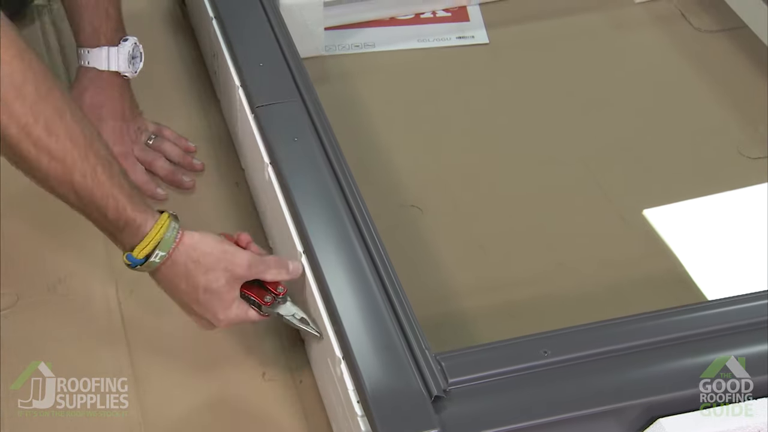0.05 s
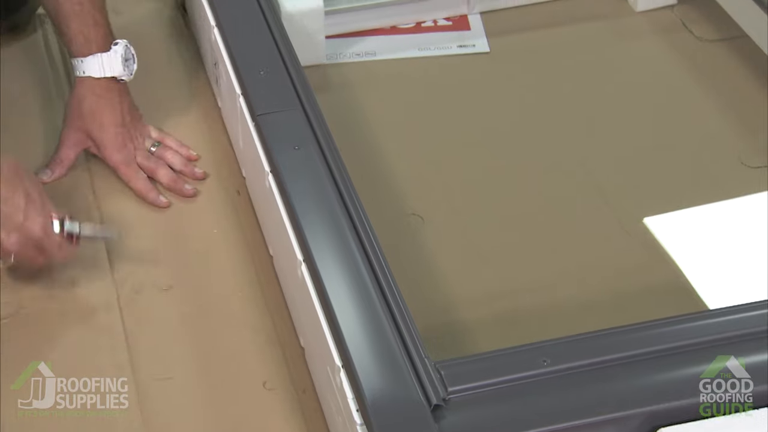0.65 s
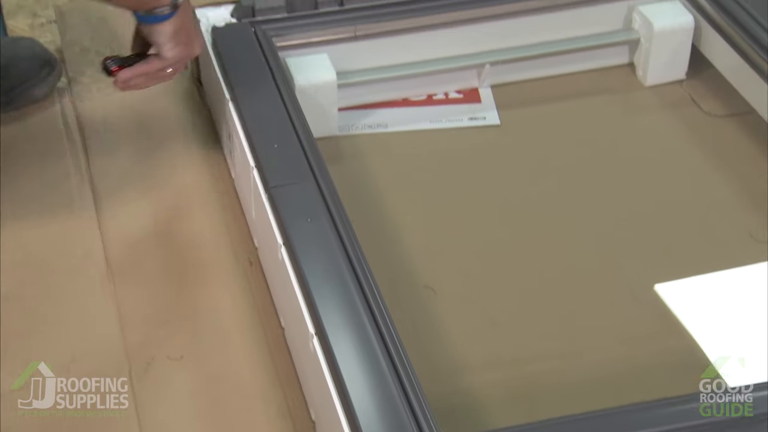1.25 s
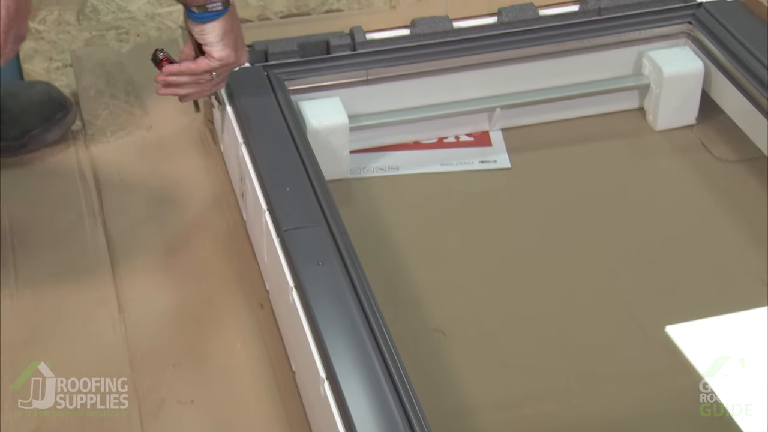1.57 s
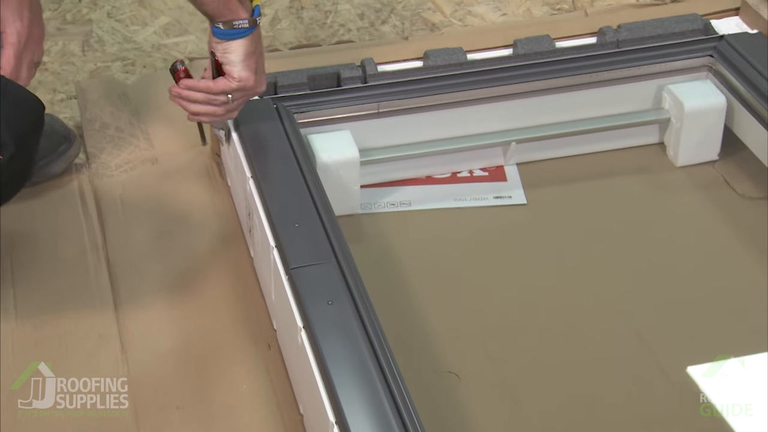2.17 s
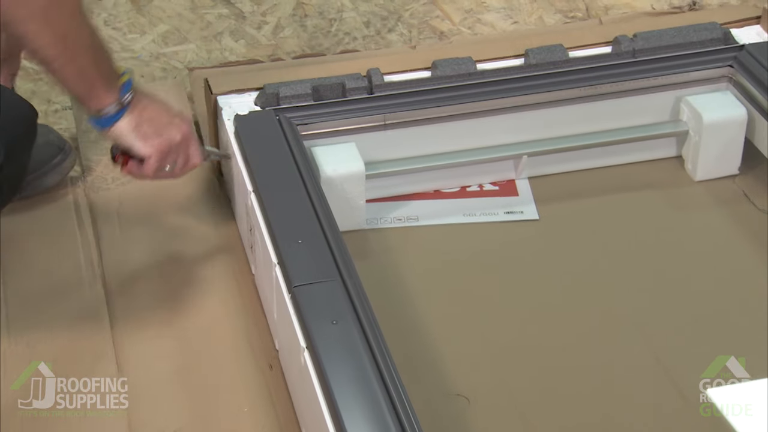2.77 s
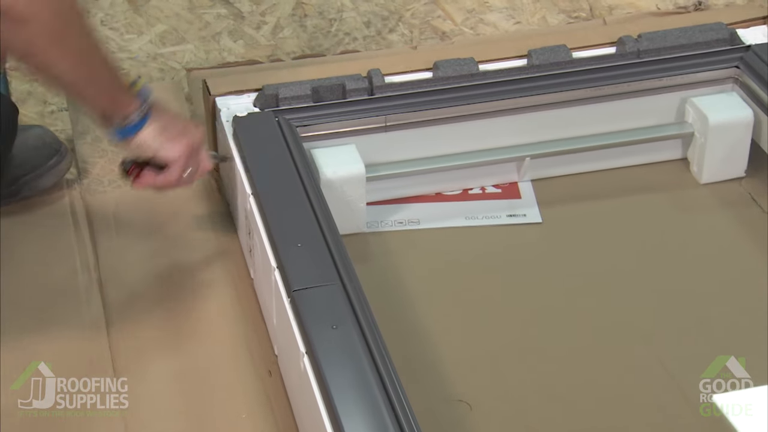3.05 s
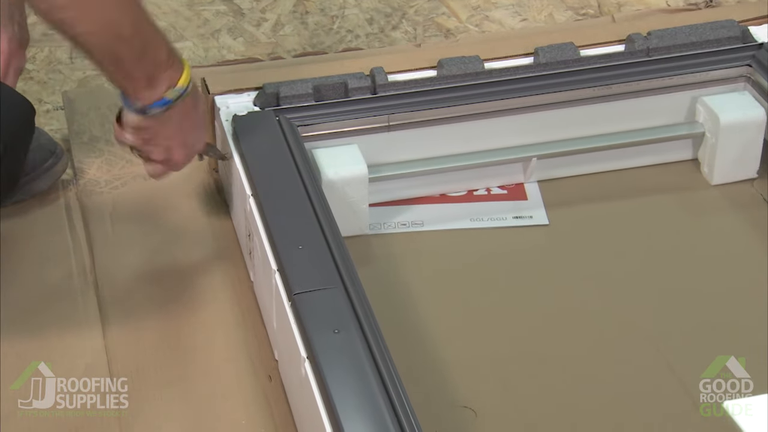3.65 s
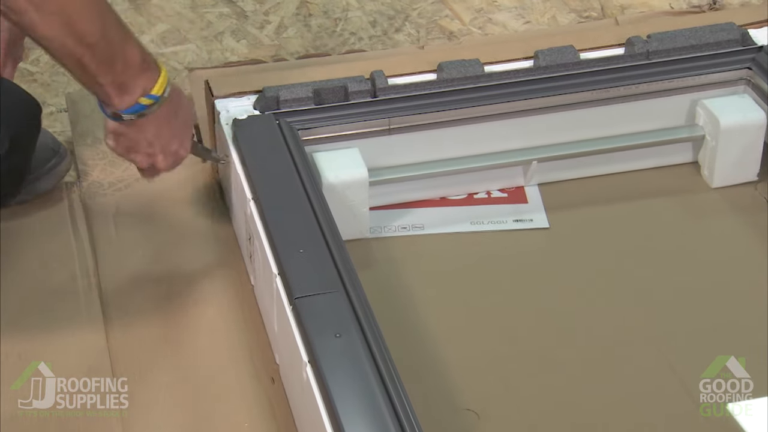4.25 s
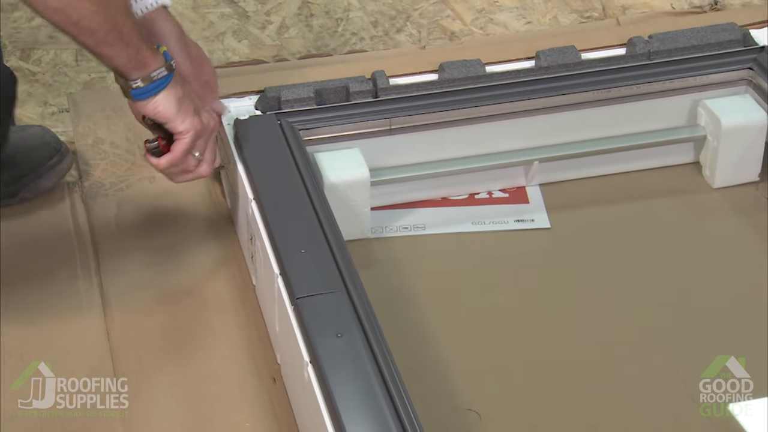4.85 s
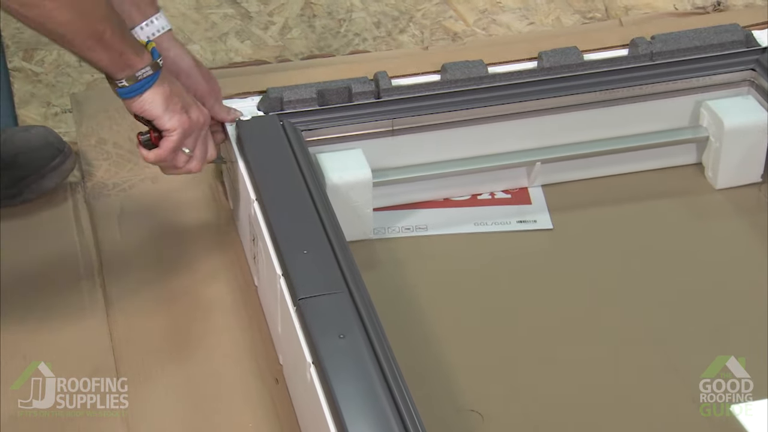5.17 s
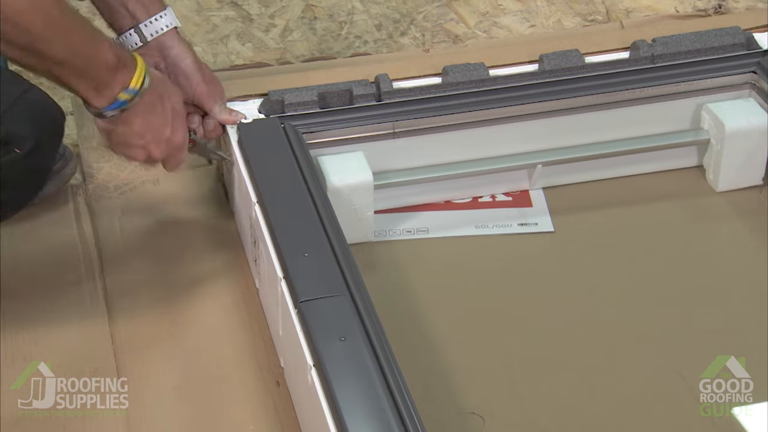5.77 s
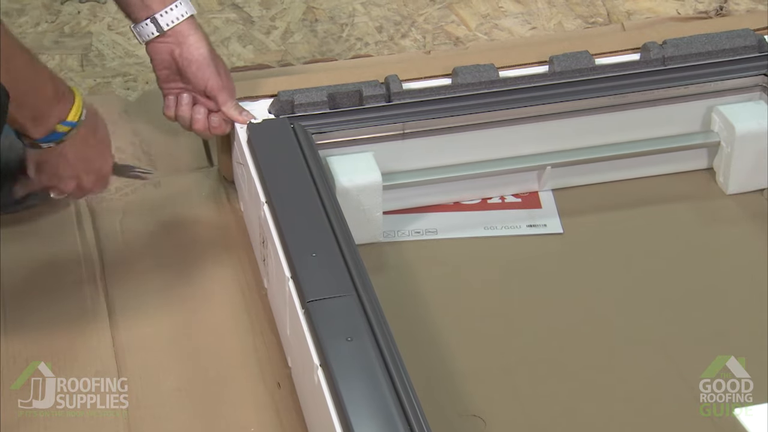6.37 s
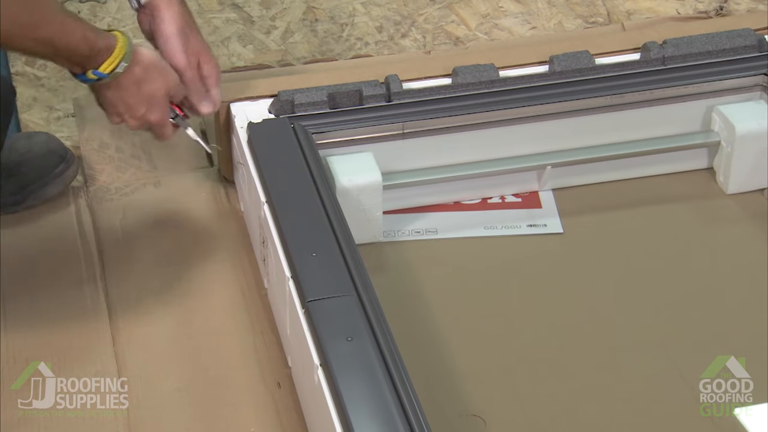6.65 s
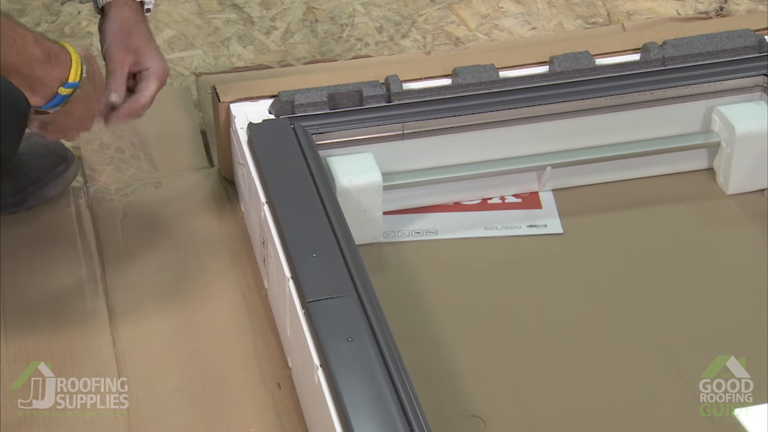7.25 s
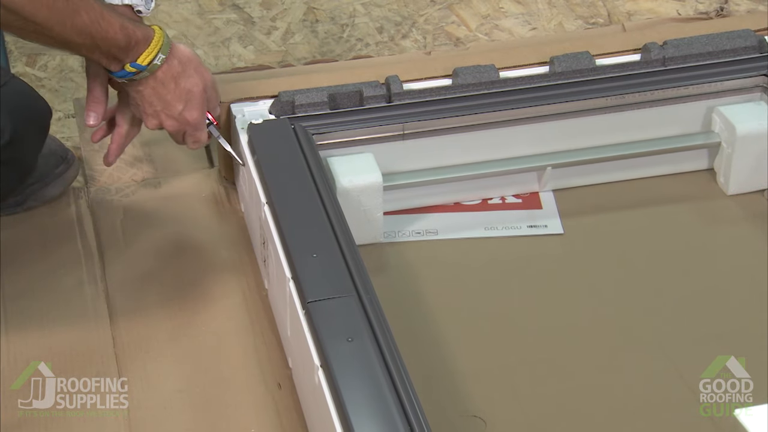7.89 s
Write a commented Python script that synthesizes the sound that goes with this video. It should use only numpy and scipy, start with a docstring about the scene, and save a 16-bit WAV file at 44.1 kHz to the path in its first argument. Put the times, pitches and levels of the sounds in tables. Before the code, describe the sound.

Pliers pull staples from a wooden window frame with sharp snaps, short squeaks and small metal ticks in an echoing workshop.

```python
"""A large workshop: pliers pull staples out of a wooden window frame that lies on cardboard.
The jaws tick, knock and skid as they find a grip. Staples squawk by stick-slip in the wood and
snap free; the steel rings, the frame creaks and booms. Hands and sleeves brush about between
pulls. The hall answers every snap, over faint rumble, hiss and hum."""
import sys
import numpy as np
from scipy import signal
from scipy.fft import rfft, irfft
from scipy.io import wavfile
from scipy.ndimage import uniform_filter1d

SR = 44100
rng = np.random.default_rng(int(sys.argv[2]) if len(sys.argv) > 2 else 0)


def wrap_up_sound(samples):
    """Save the sound to the file named by the first command line argument, as 16-bit audio."""
    columns = np.atleast_2d(samples).T
    # keep every value between -1 and 1, then stretch to whole-number steps
    tamed = np.clip(columns, -1, 1)
    steps = np.round(tamed * 32767).astype(np.int16)
    wavfile.write(sys.argv[1], SR, steps)


N = 353839
TIME_S = np.arange(N) / SR

# room noise spectrum: freq_hz, gain_db
ROOM_SPECTRUM = [(8.8, -36), (15, -9.5), (54, -4.5), (155, -22), (233, -19.5), (330, -21.5), (371, -17),
                 (455, -27), (497, -15), (610, -25), (748, -24), (1640, -33.5), (2200, -37.5), (14700, -39),
                 (16000, -40.5)]
# room hum: pitch_hz, level_db
HUM_TONES = [(48.4, -78), (366, -87.5), (500, -86.5)]
# hall tail decay: freq_hz, t60_s
TAIL_DECAY = [(60, 0.46), (200, 0.88), (500, 0.99), (1100, .92), (1700, .78), (3000, 0.99), (6000, 0.53),
              (10000, .52), (16000, 0.43)]
# hall tail spectrum: freq_hz, gain_db
TAIL_SPECTRUM = [(40, -14), (120, -9), (200, -2), (340, 2.5), (470, -9.5), (580, -11), (720, -3),
                 (1100, -7), (2000, -2.5), (4000, -6), (8000, -5.5), (16000, -12)]
# near surfaces: delay_s, gain
REFLECTIONS = [(.0046, 0.47), (.0092, 0.034), (0.012, -0.11), (.0178, .13), (.0265, 0.19)]
# skin and cloth strokes: start_s, end_s, level_db, tilt_db_per_oct, rasp_db
BRUSH_STROKES = [(0.521, 0.646, -46, -0.6, -8), (0.741, .94, -51.5, 0.75, -10.5),
                 (.98, 1.401, -61, -0.5, -4.5), (4.218, 4.35, -51.5, -3, -7.5),
                 (4.713, 4.944, -57.5, 0, -0.5), (5.149, 5.502, -69, -3, -1),
                 (6.439, 6.894, -62.5, -0.4, -3.5), (6.771, 6.99, -77, 2.7, 1.5),
                 (7.031, 7.181, -65, -1.6, -0.5), (7.15, 7.421, -66, -2.5, -3),
                 (7.613, 8.045, -70.5, -9, 26)]
# colour of all brushing: freq_hz, gain_db
CLOTH_SPECTRUM = [(40, 0.5), (400, 2.5), (1000, -1), (2200, -2), (3400, 0.5), (5500, -0.5), (12000, -2),
                  (16000, -12.5)]
# range lifted by a rough stroke: freq_hz, rasp_share
RASP_LIFT = [(700, 0.063), (3600, 1), (9500, 1), (13500, 0)]
# wood groaning under leverage: start_s, end_s, level_db
WOOD_CREAKS = [(-.15, 0.356, -68.5), (1.777, 1.97, -68.5), (2.1, 2.249, -54.5), (2.198, 2.379, -72.5),
               (3.216, 3.381, -68.5), (3.371, 3.528, -65), (3.512, 3.661, -71.5), (5.119, 5.3, -66.5),
               (7.911, 8.072, -66)]
# colour of the wood: freq_hz, gain_db
WOOD_SPECTRUM = [(40, -17), (80, -2), (130, 5.5), (330, 1), (560, 3), (800, -6.5), (1000, -14),
                 (1250, -10.5), (1500, -8.5), (1900, -23), (2300, -16.5), (2650, -18.5), (3500, -29),
                 (5500, -33), (16000, -42)]
# blows shoving the frame against the floor: start_s, push_db, push_rise_s, boom_db
FRAME_THUDS = [(.247, -44, .0018, -47), (0.313, -37, 0.0033, -50), (.573, -50, .0022, -59),
               (0.705, -52.5, 0.0076, -74), (2.149, -61, .003, -52), (2.579, -53, 0.0019, -70.5),
               (2.685, -48, 0.0032, -82.5), (3.75, -38.5, 0.0027, -57), (4.023, -52.5, 0.0026, -57),
               (4.604, -54, .002, -65.5), (5.9205, -33, 0.0017, -35), (5.947, -38, .002, -49.5),
               (7.592, -46, .0032, -81)]
# low frame modes: freq_hz, level_db, t60_s
FRAME_MODES = [(58, -11, .3), (79, -9.5, .3), (99, -2, 0.32), (135, -3.5, 0.71), (151, -8, .15),
               (197, -11, 0.055), (250, -10, 0.04), (302, -5, .2)]
# steel modes of the pliers: freq_hz, level_db, t60_s
PLIER_MODES = [(2443, -3, .3), (3110, -7, .12), (3327, -5, .45), (3510, -7, .3), (4190, -2, .12),
               (4380, -4, .2), (4534, -1, .2), (4882, -6, .2)]
# blows that ring the pliers: start_s, level_db
PLIER_RINGS = [(.315, -44), (2.685, -71.5), (3.756, -61.5), (5.92, -58)]
# steel skidding on steel: start_s, pitch_hz, level_db
JAW_SKIDS = [(.314, 4400, -27.5), (.597, 2730, -46), (2.238, 7950, -71), (2.265, 7440, -67),
             (2.283, 2840, -68), (2.685, 14020, -51), (5.919, 5340, -38), (7.106, 14550, -65),
             (7.125, 7680, -67), (7.189, 7580, -72), (7.59, 8030, -51.5)]
# staple slipping in wood, and one short tone at 2.1 s under the creak: start_s, pitch_hz, level_db, swell_s,
# decay_s
STAPLE_SQUEAKS = [(.245, 435, -49, 0.0035, 0.014), (.316, 247.5, -41, 0.0041, 0.022),
                  (.530, 554, -36.5, 0.0016, 0.019), (.568, 708, -39.5, 0.0044, .004),
                  (1.469, 988, -43, 0.0031, 0.0032), (1.470, 533, -42, 0.0021, 0.0095),
                  (1.557, 570, -39.5, .0035, 0.018), (1.84, 366, -57, 0.0055, 0.0086),
                  (2.115, 556, -47.5, 0.025, 0.021), (3.286, 576, -48.5, 0.0069, .014),
                  (3.752, 563, -14, .0065, 0.007), (3.756, 322, -33, 0.008, .016),
                  (3.767, 584, -26, .005, .008), (3.850, 1663, -32, 0.0047, 0.012),
                  (5.9215, 1048, -14, 0.002, .00092), (5.925, 518, -26, 0.0015, 0.004),
                  (7.592, 880, -38, 0.0039, 0.0027)]
# jaws meeting staple and frame: start_s, level_db, tilt_db_per_oct, clack_db, decay_s
JAW_CONTACTS = [(.2365, -44.5, -6, -4, 0.0044), (.2441, -41, -2, -9.5, 0.0083),
                (.3272, -45.5, 0.9, 6.5, 0.013), (.53, -45, -3, -2, 0.013), (.569, -55.5, -3, 9, 0.0069),
                (.598, -68, -0.5, 24, 0.0055), (.667, -80, 1.6, 23.5, 0.0067),
                (.705, -63.5, 1.6, 11, 0.0018), (.7735, -76, 2, 12, 0.0037), (1.467, -40, -5.5, -2, 0.012),
                (1.557, -43, -6, -3, 0.034), (1.806, -65.5, -3, -8, 0.0022),
                (1.842, -52.5, -11, -6.5, .006), (2.238, -75, -1, 7, .002), (2.266, -74, -1, 3, .003),
                (2.285, -74, -6, 14.5, .005), (2.546, -67, -3.5, 3, .0048),
                (2.686, -55, -1.12, 1.5, 0.0073), (3.259, -52, -4, -10.5, .004),
                (3.288, -52, -7, -8.5, .0066), (3.55, -59, -6.5, -3, .006), (3.847, -54.5, 0.25, 8, 0.0056),
                (3.887, -41.5, -3.5, 5, 0.051), (4.136, -69, -2.5, 7, .004),
                (4.2435, -62.5, -2, -11, 0.0023), (4.406, -83, 1.2, 12.5, 0.0031),
                (5.1766, -60, -0.13, -0.5, 0.0044), (5.8461, -53.5, -2.1, 3.5, 0.0028),
                (5.883, -53.5, -6.5, 5, .006), (5.9079, -72.5, 3.5, -4.5, 0.0032),
                (6.2267, -80.5, 3, -3, 0.0025), (6.236, -54, -2.5, -1, 0.0043),
                (6.9557, -85, 2.5, -8, 0.0019), (7.026, -61.5, -4.7, -3, 0.0037), (7.47, -86, 3, -6, .003),
                (7.592, -52.5, -1.14, 5, 0.0054), (7.72, -73, 0.5, 16.5, 0.0029),
                (7.734, -73.5, 1.4, 15, 0.0085), (7.811, -70, -3.5, 20.5, .004),
                (7.8252, -70, 1.4, 11, 0.0084), (7.8825, -77.5, 1, 13, 0.002), (7.954, -56, -5, 5, 0.016)]
# colour of all contacts: freq_hz, gain_db
CONTACT_SPECTRUM = [(30, -15), (120, -9.5), (240, -5.5), (500, 2.5), (720, 0.5), (1080, 0.5), (1800, -4.5),
                    (2600, -2.5), (4500, -3.5), (5900, -3.5), (8300, -1), (16000, -2.5)]
# midrange lifted by a hard contact: freq_hz, clack_share
CLACK_LIFT = [(450, 0), (1150, 0.96), (3300, .9), (10000, 0)]
# level spread over wider bands in the treble: freq_hz, gain_db
BAND_SPREAD = [(450, -28), (1150, -30.5), (3300, -37), (10000, -40)]
# staple tearing free:
# release_s, fracture_lead_s, fracture_db, release_db, tilt_db_per_oct, clack_db, decay_s
STAPLE_PULLS = [(0.3144, .005, -44.5, -40.5, 0.9, 7, .008), (3.755, .0056, -42, -35, -4, 5, 0.0078),
                (5.9227, .0033, -34.5, -30.5, -3, 3, 0.0069)]


def amp(db):
    return 10 ** (np.asarray(db) / 20)


def unit_rms(x):
    return x / np.sqrt(np.mean(x ** 2) + 1e-20)


def lookup(points, hz):
    """Interpolate (freq_hz, value) rows over log frequency."""
    freq_hz, value = np.transpose(points)
    return np.interp(np.log(hz + 1), np.log(freq_hz + 1), value)


def add(mix, start_s, sound):
    part = mix[max(round(start_s * SR), 0):][:len(sound)]
    part += sound[:len(part)]


def bandpass(x, low_hz, high_hz, order=3):
    return signal.sosfilt(signal.butter(order, [low_hz, high_hz], "band", fs=SR, output="sos"), x)


def coloured(x, spectrum):
    """Filter by (freq_hz, gain_db) rows."""
    hz = np.fft.rfftfreq(len(x), 1 / SR)
    return irfft(rfft(x) * amp(lookup(spectrum, hz)), len(x))


def timbre_db(hz, pivot_hz, tilt_db_per_oct, lift_db, lift):
    """Tilt from the pivot to the top of the lift table, plus the lifted range."""
    octaves = np.log2(np.clip(hz, pivot_hz, lift[-1][0]) / pivot_hz)
    return tilt_db_per_oct * octaves + lift_db * lookup(lift, hz)


def minimum_phase(gain_db, size):
    """Spectrum of the promptest filter with these gains."""
    cepstrum = irfft(np.log(amp(gain_db)), size)
    fold = 1 + np.sign(size // 2 - np.arange(size))
    fold[0] = 1
    return np.exp(rfft(cepstrum * fold))


def damped_sine(hz, level_db, t60_s):
    t = TIME_S[:SR]
    return amp(level_db - 60 * t / t60_s) * np.sin(2 * np.pi * hz * t)


def wander(size, rate_hz):
    """Smooth random drift, unit rms."""
    span = max(int(SR / rate_hz), 1)
    return unit_rms(uniform_filter1d(uniform_filter1d(rng.standard_normal(size), span), span))


def swell(length_s, peak_share):
    """Sine-squared rise and fall."""
    progress = np.arange(0, length_s, 1 / SR) / length_s
    return np.sin(np.pi / 2 * np.interp(progress, [0, peak_share, 1], [0, 1, 0])) ** 2


def room_tone(noise_db=-68.5, waver_db=6.5, waver_hz=2.7):
    """Rumble, even hiss and a faint wavering hum."""
    hum = np.zeros(N)
    for hz, level_db in HUM_TONES:
        rms = amp(level_db + waver_db * wander(N, waver_hz))
        hum += rms * np.sqrt(2) * np.sin(2 * np.pi * hz * TIME_S)
    noise = unit_rms(coloured(rng.standard_normal(N), ROOM_SPECTRUM))
    return amp(noise_db) * noise + hum


def thin_tone(pitch_hz=1556, level_db=-75, start_s=0.65, end_s=2.16):
    """A faint sine swells and fades."""
    out = np.zeros(N)
    envelope = swell(end_s - start_s, peak_share=0.44)
    tone = np.sin(2 * np.pi * pitch_hz * TIME_S[:len(envelope)])
    add(out, start_s, amp(level_db) * envelope * tone)
    return out


def hall_tail(gap_s=0.0023, build_s=0.011):
    """Dense reflections dying band by band."""
    hz, t, bands = signal.stft(rng.standard_normal(SR + SR // 4), SR, nperseg=512)
    t60_s = lookup(TAIL_DECAY, hz)[:, None]
    envelope = amp(lookup(TAIL_SPECTRUM, hz)[:, None] - 60 * t / t60_s)
    energy_norm = np.sqrt(2 * np.log(1000) / (t60_s * SR))
    tail = signal.istft(bands * envelope * energy_norm, SR, nperseg=512)[1]
    onset = 1 - np.exp(-np.maximum(TIME_S[:len(tail)] - gap_s, 0) / build_s)
    return tail * onset


def hall(x, turn_hz=85, paths=5):
    """Floor and frame reflect first; the sound then enters the hall by ever-changing paths."""
    out = x.copy()
    for delay_s, gain in REFLECTIONS:
        add(out, delay_s, gain * x)
    for k in range(paths):
        share = np.sin(np.pi * (turn_hz * TIME_S + k / paths)) ** 2 * np.sqrt(8 / (3 * paths))
        out += signal.fftconvolve(x * share, hall_tail())[:N]
    return out


def brushing(grain_db=3.0, pressure_db=2.5, pivot_hz=700):
    """Skin and cloth: fine friction grains under slightly uneven pressure."""
    out = np.zeros(N)
    hz = np.transpose(RASP_LIFT)[0]
    for start_s, end_s, level_db, tilt, rasp_db in BRUSH_STROKES:
        envelope = swell(end_s - start_s, peak_share=0.46)
        noise, grain = rng.standard_normal((2, len(envelope)))
        friction = unit_rms(noise * amp(grain_db * grain + pressure_db * wander(len(envelope), 42)))
        cloth = coloured(friction, CLOTH_SPECTRUM)
        gain_db = level_db + timbre_db(hz, pivot_hz, tilt, rasp_db, RASP_LIFT)
        add(out, start_s, envelope * coloured(cloth, list(zip(hz, gain_db))))
    return out


def wood_creaks(slips_per_s=180, jitter=0.67, scrape_gain=0.5, scatter_db=3.5):
    """Slips of uneven size and spacing sound through the wood."""
    out = np.zeros(N)
    for start_s, end_s, level_db in WOOD_CREAKS:
        skipped = max(round(-start_s * SR), 0)
        envelope = swell(end_s - start_s, peak_share=0.29)[skipped:]
        size = len(envelope)
        rate_hz = slips_per_s * np.exp(jitter * wander(size, 280))
        slip_count = np.floor(np.cumsum(rate_hz) / SR)
        slips = unit_rms(np.diff(slip_count, prepend=0) * amp(scatter_db * wander(size, 300)))
        slips += scrape_gain * rng.standard_normal(size)
        groan = unit_rms(coloured(slips - slips.mean(), WOOD_SPECTRUM))
        add(out, start_s, amp(level_db) * envelope * groan)
    return out


def frame_thuds(rebound_gain=0.18):
    """A one-sided push of air with a slow rebound, and the boom of the frame."""
    out = np.zeros(N)
    # neighbouring modes swing in opposite directions
    boom = sum((-1) ** k * damped_sine(*mode) for k, mode in enumerate(FRAME_MODES))
    for start_s, push_db, rise_s, boom_db in FRAME_THUDS:
        u = TIME_S[:SR] / rise_s
        push = u * np.exp(1 - u) - rebound_gain * (u / 10) * np.exp(1 - u / 10)
        add(out, start_s, amp(push_db) * push + amp(boom_db) * boom)
    return out


def plier_rings():
    """The steel rings briefly, damped by the hand."""
    out = np.zeros(N)
    ring = sum(damped_sine(*mode) for mode in PLIER_MODES)
    for start_s, level_db in PLIER_RINGS:
        add(out, start_s, amp(level_db) * ring)
    return out


def jaw_skids(half_width=0.11, rise_s=0.0014):
    """Jaws skid on a staple: a tiny chirp of narrow-band noise."""
    out = np.zeros(N)
    u = TIME_S[:SR // 20] / rise_s
    envelope = u * np.exp(1 - u)
    for start_s, hz, level_db in JAW_SKIDS:
        noise = rng.standard_normal(len(u))
        chirp = bandpass(noise, hz * (1 - half_width), hz * (1 + half_width), order=2)
        add(out, start_s, amp(level_db) * envelope * unit_rms(chirp))
    return out


def staple_squeaks(waver_share=0.011, overtone_db=-27, shake_db=1.5):
    """Stick-slip builds one tone in staple and wood; it dies once the leg lets go."""
    out, t = np.zeros(N), TIME_S[:SR // 6]
    for start_s, hz, level_db, swell_s, decay_s in STAPLE_SQUEAKS:
        pitch_hz = hz * (1 + waver_share * wander(len(t), 230))
        phase = 2 * np.pi * np.cumsum(pitch_hz) / SR
        tone = np.sin(phase) + amp(overtone_db) * np.sin(2 * phase)
        rise = np.sin(np.pi / 2 * np.minimum(t / swell_s, 1)) ** 2
        fall = np.exp(-np.maximum(t - swell_s, 0) / decay_s)
        gain = amp(level_db - shake_db * wander(len(t), 450))
        add(out, start_s, gain * rise * fall * tone)
    return out


def tool_ticks(ticks_per_s=2, count=30, level_db=-85, scatter_db=3.0, tilt_db_per_oct=1.14):
    """Contact rows: the tool shifts in the hand at random times."""
    times_s = np.cumsum(rng.exponential(1 / ticks_per_s, count))
    clack_db, decay_s = 0, 0.002
    return [(start_s, level_db + scatter_db * force, tilt_db_per_oct + bright / 2, clack_db, decay_s)
            for start_s, (force, bright) in zip(times_s, rng.standard_normal((count, 2)))]


def staple_pulls(brighter_db_per_oct=1):
    """Contact rows: a brighter first fracture, then the release."""
    rows = []
    for release_s, lead_s, fracture_db, release_db, tilt, clack_db, decay_s in STAPLE_PULLS:
        rows.append((release_s - lead_s, fracture_db, tilt + brighter_db_per_oct, clack_db, decay_s))
        rows.append((release_s, release_db, tilt, clack_db, decay_s))
    return rows


def contact_snaps(contacts, grain_db=7.0, rise_s=0.00058, snap_gain=0.37, pivot_hz=417, size=4096):
    """Each contact: one clean snap in a shower of tiny fractures; the bass lingers longest."""
    edges_hz, decay_factors = (60, 700, 2000, 5500, 17000), (1.5, 1.1, 0.8, 0.6)
    out, t, hz = np.zeros(N), TIME_S[:size], np.fft.rfftfreq(size, 1 / SR)
    impulse = SR / np.sqrt(200) * signal.unit_impulse(size, SR // 1000)
    shared_db = lookup(BAND_SPREAD, hz) + lookup(CONTACT_SPECTRUM, hz)
    for start_s, level_db, tilt, clack_db, decay_s in contacts:
        noise, grain = rng.standard_normal((2, size))
        shower = noise * amp(grain_db * np.clip(grain, -2, 2)) * (1 - np.exp(-t / rise_s))
        burst = snap_gain * impulse
        for low_hz, high_hz, factor in zip(edges_hz, edges_hz[1:], decay_factors):
            fractures = shower * rng.choice([-1, 1], size) * np.exp(-t / (decay_s * factor))
            width_gain = np.sqrt((high_hz - low_hz) * SR / 100 / size)
            burst += width_gain * unit_rms(bandpass(fractures, low_hz, high_hz))
        gain_db = level_db + timbre_db(hz, pivot_hz, tilt, clack_db, CLACK_LIFT) + shared_db
        snap = irfft(rfft(burst) * minimum_phase(gain_db, size), size)
        add(out, start_s, snap / np.hypot(1, snap_gain))
    return out


def scene():
    """The work sounds through the hall, over the background; mono."""
    snaps = contact_snaps(JAW_CONTACTS + staple_pulls() + tool_ticks())
    tool = snaps + plier_rings() + staple_squeaks() + jaw_skids()
    work = tool + frame_thuds() + wood_creaks() + brushing()
    return (hall(work) + thin_tone() + room_tone())[None]


def record(dry):
    """Steep low-pass."""
    cutoff_hz = 16300
    lowpass = signal.firwin(401, cutoff_hz, window=("kaiser", 9), fs=SR)
    return signal.oaconvolve(dry, lowpass[None], "same")


dry = scene()
out = record(dry)
wrap_up_sound(out)
```